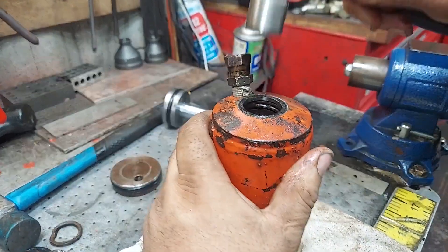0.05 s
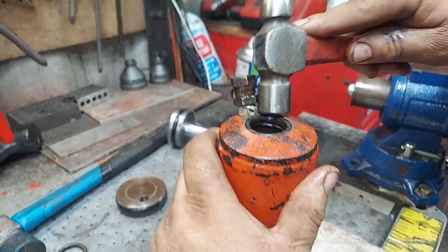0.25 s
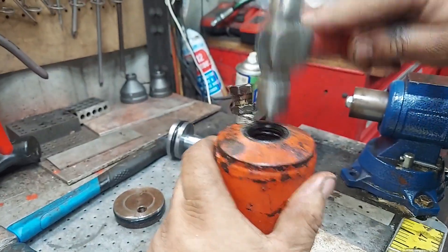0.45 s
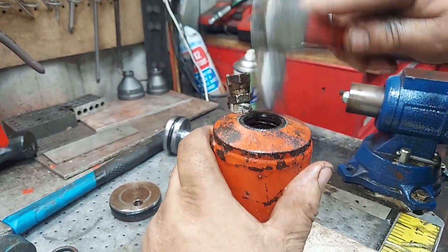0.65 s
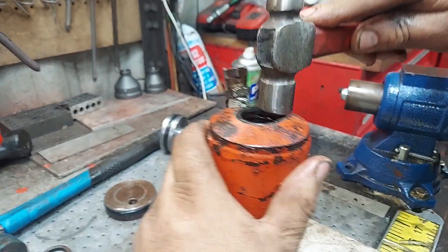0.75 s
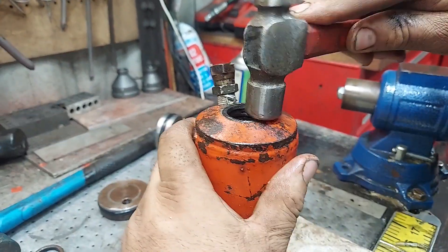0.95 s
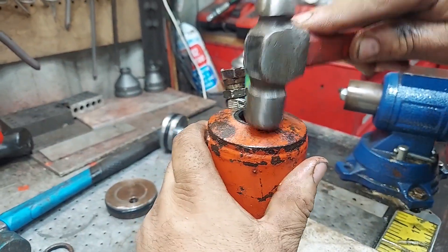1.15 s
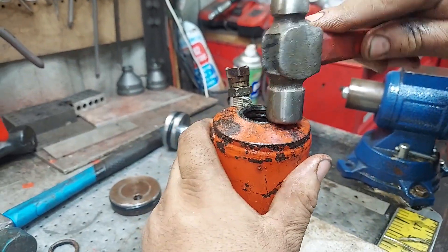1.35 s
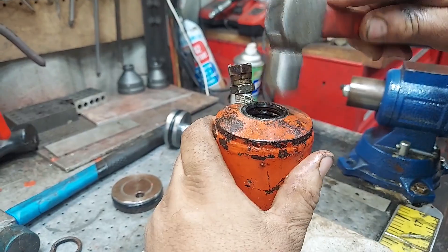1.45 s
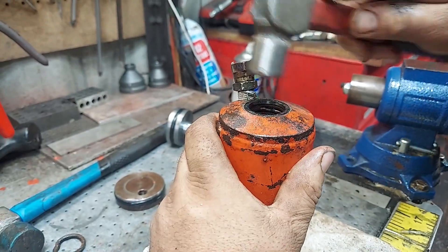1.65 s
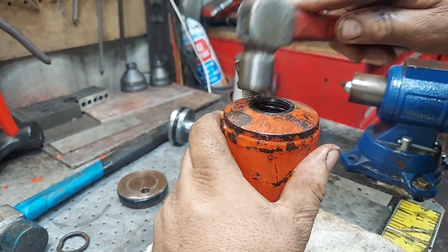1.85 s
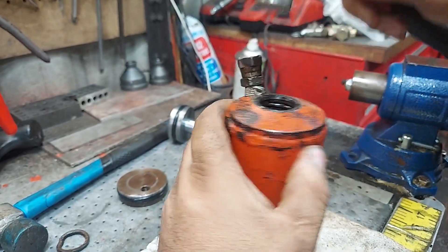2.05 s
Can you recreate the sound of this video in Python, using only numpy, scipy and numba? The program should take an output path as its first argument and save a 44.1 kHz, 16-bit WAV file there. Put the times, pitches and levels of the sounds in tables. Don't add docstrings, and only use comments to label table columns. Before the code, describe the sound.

A small hammer strikes a metal seal in a hand-held cylinder, eight main cracking blows with short rings and bench thumps, then faint rebounds and a slight shuffle, close phone microphone in a small cluttered workshop.

```python
import sys
import numpy as np
from scipy import signal
from scipy.fft import rfft, irfft
from scipy.io import wavfile
from scipy.ndimage import uniform_filter1d
from numba import njit

SR = 44100
rng = np.random.default_rng(int(sys.argv[2]) if len(sys.argv) > 2 else 0)


def to_wav(sig):
    pcm = np.clip(np.atleast_2d(sig), -1, 1) * 32767
    pcm = np.round(pcm).astype(np.int16)
    wavfile.write(sys.argv[1], SR, pcm.T)


def elevation(decibels):
    levels = np.asarray(decibels, float)
    return 10 ** (levels / 20)


N = 92610
LEAD = 8192
RING = 24000

# frequency in Hz, left-right likeness from -1 to 1.
LIKENESS = [(60, .9), (320, .93), (600, .3), (1200, -.1), (3000, .15), (12000, .05)]


def table(points, hz):
    p = np.array(points, float)
    return np.interp(np.log(np.maximum(hz, 1)), np.log(np.maximum(p[:, 0], 1)), p[:, 1])


def pair(size):
    hz = np.arange(size // 2 + 1) * SR / size
    alike = np.clip(table(LIKENESS, hz), -.9, 1)
    mid, side = rfft(rng.standard_normal((2, size)))
    opposite = np.array([[1], [-1]])
    return hz, (np.sqrt(1 + alike) * mid + np.sqrt(1 - alike) * side * opposite) / np.sqrt(2)


def unit_rms(x):
    return x / np.sqrt(np.mean(x ** 2))


def coloured(points, size):
    hz, spec = pair(size)
    return unit_rms(irfft(spec * elevation(table(points, hz)), size))


def narrow(hz, width):
    f, spec = pair(N)
    return unit_rms(irfft(spec / (1 + ((f - hz) / width) ** 2), N))


def ring(modes, scatter_db, detune, rise_s, turn_rad=2.0, burst_db=-60, twin_db=-12, spread=.0013):
    hz, db, t60 = np.array(modes, float).T[:, :, None]
    t = np.arange(RING) / SR
    chance = rng.standard_normal((6, len(modes), 1))
    turn = np.arccos(np.clip(table(LIKENESS, hz), -1, 1)) / 2 * np.sign(chance[3])
    rise = (1 - np.exp(-t / rise_s)) ** 2
    fade = elevation(-60 * t / np.maximum(t60, .01)) + elevation(burst_db - 60 * t / .035)
    twins = sum(np.sin(2 * np.pi * hz * spread * c * t + 9 * c) for c in chance[4:])
    size = elevation(db + scatter_db * chance[0]) * rise * fade * (1 + elevation(twin_db) * twins)
    phase = 2 * np.pi * hz * (1 + detune * chance[1]) * t + turn_rad * chance[2]
    return np.array([np.sum(size * np.sin(phase + s * turn), axis=0) for s in (1, -1)])


def blows():
    # start in seconds, then crack, bench, hammer head and cylinder levels in dB.
    blow_rows = [
        (.2368, -14, -14.5, -17, -30),
        (.4832, -26.5, -49.5, -30, -38.5),
        (.4955, -16.5, -17, -43, -18),
        (.5136, -26, -24, -24, -38),
        (.7132, -16, -16, -15.5, -37.5),
        (.9119, -20.5, -17, -25, -44.5),
        (1.1157, -18, -18, -23.5, -28),
        (1.3286, -16.5, -18, -20, -46),
        (1.5205, -18, -18, -21, -26),
        (1.7562, -19.5, -17.5, -44.5, -46.5),
    ]
    # start in seconds, then the same four levels in dB.
    touch_rows = [
        (-.07, -23, -23.5, -33, -33),
        (0.397, -56.5, -83, -56, -52),
        (.611, -47, -48.5, -47.5, -39.5),
        (1.82, -36, -42.5, -41.5, -28),
        (1.885, -54.5, -64.5, -62, -65),
        (1.937, -61.5, -78, -73, -72),
    ]
    out = np.zeros((2, LEAD + N + RING))
    for s, crack_db, bench_db, head_db, cylinder_db in list(blow_rows) + list(touch_rows):
        i = LEAD + int(s * SR)
        out[:, i:i + RING] += (elevation(crack_db + 4) * crack()
                               + elevation(bench_db) * bench()
                               + elevation(head_db) * hammer_head()
                               + elevation(cylinder_db - 2) * cylinder())
    return out


def crack():
    # frequency in Hz, level in dB per Hz.
    crack_colour = [(210, -38), (340, 6.5), (1500, 1), (3200, -6), (5500, -12.5), (9000, -15), (12500, -23),
                    (14000, -63)]
    crack_s, rattle_db, rattle_hold_s, rattle_s = .0025, -4, .021, .017
    flutter_db, flutter_s = 3, .002
    t = np.arange(RING) / SR
    k = int(flutter_s * SR)
    flutter = elevation(flutter_db * np.sqrt(k) * uniform_filter1d(rng.standard_normal(RING), k))
    rattle = flutter / np.sqrt(1 + np.exp(np.minimum(2 * (t - rattle_hold_s) / rattle_s, 60)))
    return coloured(crack_colour, RING) * (np.exp(-t / crack_s) + elevation(rattle_db) * rattle)


def hammer_head():
    # frequency in Hz, level in dB, 60 dB decay time in seconds.
    head_modes = [(4312, -10, .2), (7098, 0, .16), (7176, -3, .17), (7290, -4, .12), (7520, -9, .07),
                  (8050, -12, .12), (8769, -10, .19), (9545, -14, .1), (10800, -6, .16), (11700, -16, .1),
                  (12375, -9, .15), (12557, -9, .15), (14910, -10, .16), (15700, -22, .05)]
    # frequency in Hz, level in dB per Hz.
    tick_colour = [(1000, -20), (5000, -8), (8000, -2), (12500, -3), (13800, -20), (15200, -9),
                   (17000, -22)]
    tick_db, tick_s = 2, .003
    tick = elevation(tick_db) * coloured(tick_colour, RING) * np.exp(-np.arange(RING) / SR / tick_s)
    return tick + ring(head_modes, scatter_db=2, detune=.0006, rise_s=.0003, turn_rad=1.33,
                       burst_db=8, twin_db=-7, spread=.01)


def cylinder():
    # frequency in Hz, level in dB, 60 dB decay time in seconds.
    cylinder_modes = [(1530, -6, .02), (2606, 0, .24), (2648, -12, .18)]
    return ring(cylinder_modes, scatter_db=2, detune=.0006, rise_s=.0003)


def bench():
    # frequency in Hz, level in dB, 60 dB decay time in seconds.
    bench_modes = [(72.1, -10, 0.41), (85.14, -11, 0.41), (99.2, 12, 0.08), (103.3, -4.5, .3),
                   (131.1, -7, 0.27), (236.2, -11.5, 0.34), (305, -6.5, 0.21), (341.2, 1.5, 0.14),
                   (405.5, 5.5, 0.12), (450, 0.5, .11), (565, 0, 0.14), (632.2, 0, 0.12), (885, -9, .15),
                   (1539, -2, .12)]
    return ring(bench_modes, scatter_db=1.2, detune=.008, rise_s=.004, turn_rad=.3,
                burst_db=-66, twin_db=-18, spread=.08)


def room(x):
    # frequency in Hz, 60 dB decay time in seconds.
    room_t60 = [(100, 0.69), (400, 0.42), (1100, 0.4), (2900, 0.32), (7700, 0.22), (15000, 0.2)]
    rise_s, low_hz = .018, 205
    hz, spec = pair(RING)
    t, echo = np.arange(RING) / SR, 0
    rise = 1 - np.exp(-t / rise_s)
    for octave in 60 * 2. ** np.arange(9):
        t60 = table(room_t60, octave)
        band = np.clip(1 - np.abs(np.log2(np.maximum(hz, 1) / octave)), 0, 1)
        noise = irfft(spec * band * hz / np.hypot(hz, low_hz), RING)
        tail = noise * elevation(-60 * t / t60) * rise
        echo = echo + tail / np.sqrt(t60 * SR / 14)
    return signal.fftconvolve(x, echo, axes=1)[:, :x.shape[1]]


def shop():
    # frequency in Hz, level in dB per Hz.
    shop_colour = [(18, -44), (30, -14), (109, -1), (1010, -24), (1540, -8), (2290, -38), (7670, -36),
                   (9460, -51), (16000, -28)]
    # frequency in Hz, level in dB.
    whine = [(1530, -73), (6000, -88), (7800, -86)]
    # centre in seconds, length in seconds, centre in Hz, level in dB.
    shuffles = [
        (1.923, 0.024, 450, -49),
        (1.991, 0.039, 132, -38),
        (2.006, 0.072, 410, -52),
        (2.052, 0.12, 2040, -57),
        (2.067, 0.052, 10900, -63),
    ]
    t = np.arange(N) / SR
    out = elevation(-60) * coloured(shop_colour, N)
    for hz, db in whine:
        out = out + elevation(db) * narrow(hz, 60.)
    for s, length, hz, db in shuffles:
        swell = np.exp(-((t - s) / length) ** 2)
        out = out + elevation(db) * swell * narrow(hz, 0.54 * hz)
    return out


def scene():
    dry = blows()
    room_db, pan_db = -12.5, -1.2
    hits = (dry + elevation(room_db) * room(dry))[:, LEAD:LEAD + N]
    return hits * elevation(np.array([[pan_db], [-pan_db]]) / 2) + shop()


@njit
def follow(x, release):
    e, out = 0., np.empty(len(x))
    for i in range(len(x)):
        e = max(x[i], e * release)
        out[i] = e
    return out


def low_pass(x):
    return signal.sosfilt(signal.butter(12, 17110, fs=SR, output="sos"), x)


def record(dry):
    low_hz, top_hz = 50, 16200
    limit_db, ratio, release_s = -4, 4, .02
    x = signal.sosfilt(signal.butter(2, low_hz, "high", fs=SR, output="sos"), dry)
    ahead = np.roll(np.abs(x).max(axis=0), -24)
    peak = follow(ahead, np.exp(-1 / (release_s * SR)))
    gain = np.minimum(1, elevation(limit_db) / (peak + 1e-9)) ** (1 - 1 / ratio)
    x = x * uniform_filter1d(gain, size=48)
    x = signal.sosfilt(signal.butter(10, top_hz, fs=SR, output="sos"), x)
    return low_pass(x)


dry = scene()
out = record(dry)
to_wav(out)
```